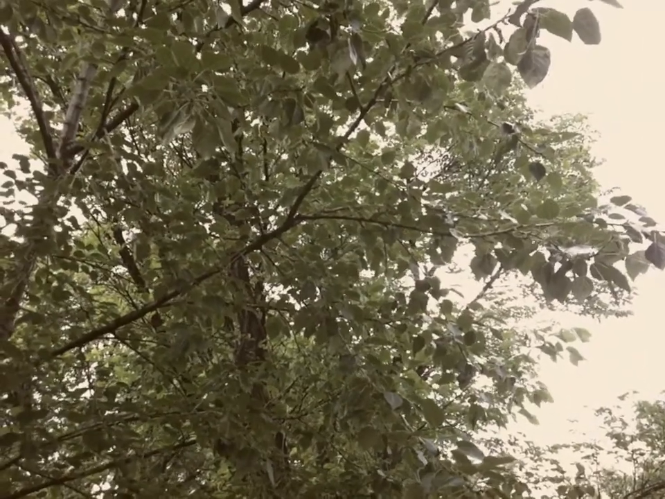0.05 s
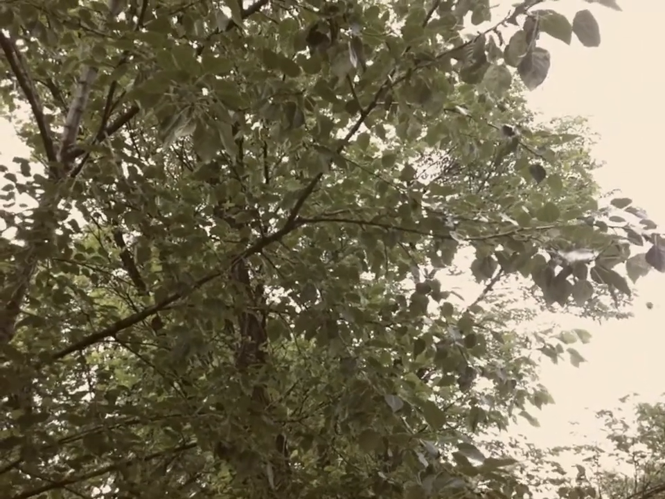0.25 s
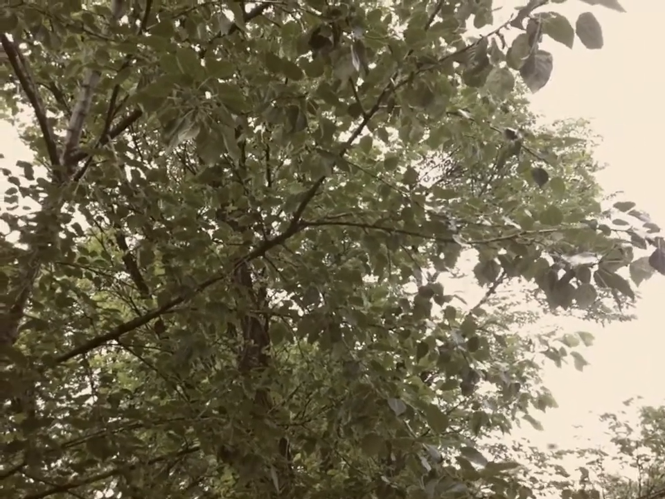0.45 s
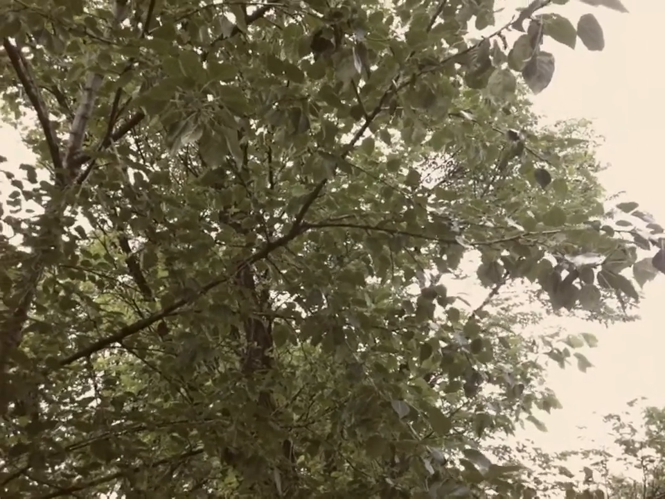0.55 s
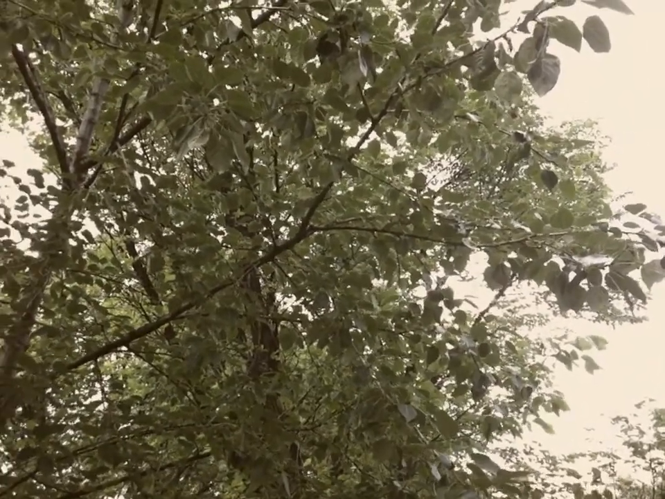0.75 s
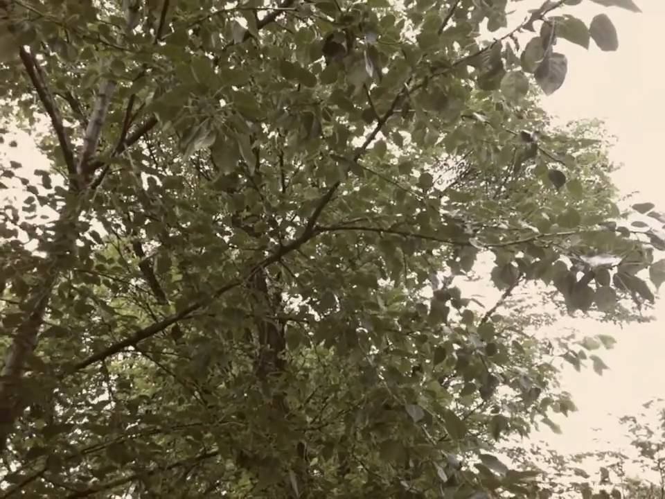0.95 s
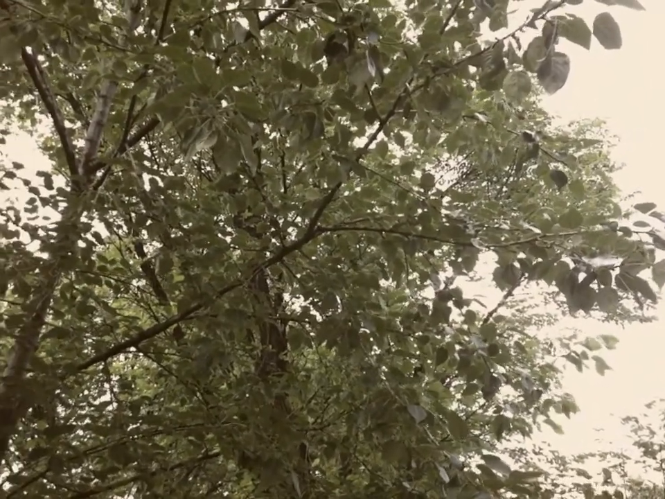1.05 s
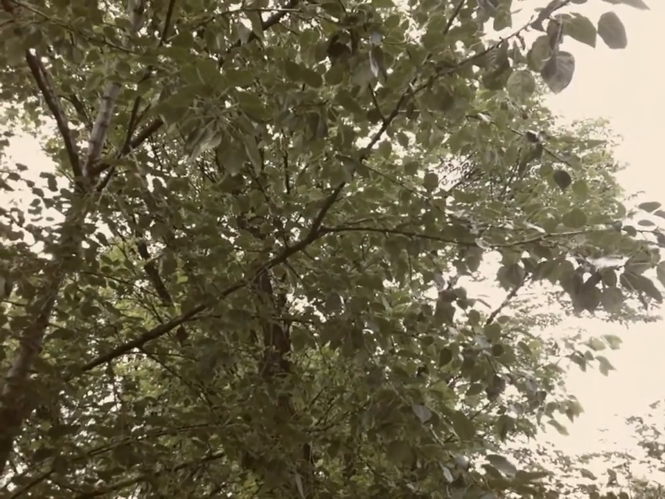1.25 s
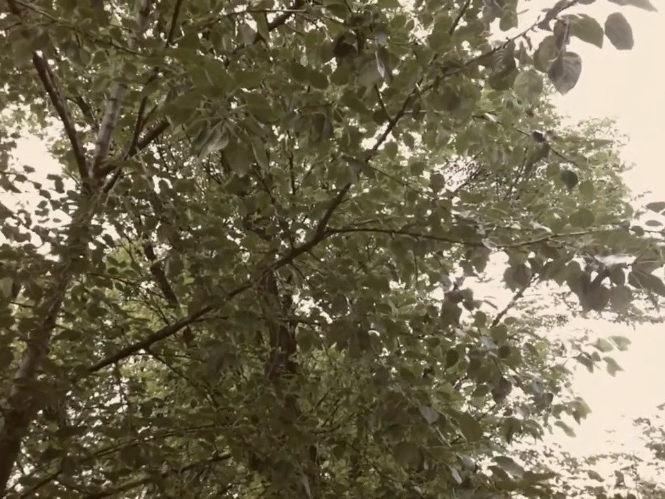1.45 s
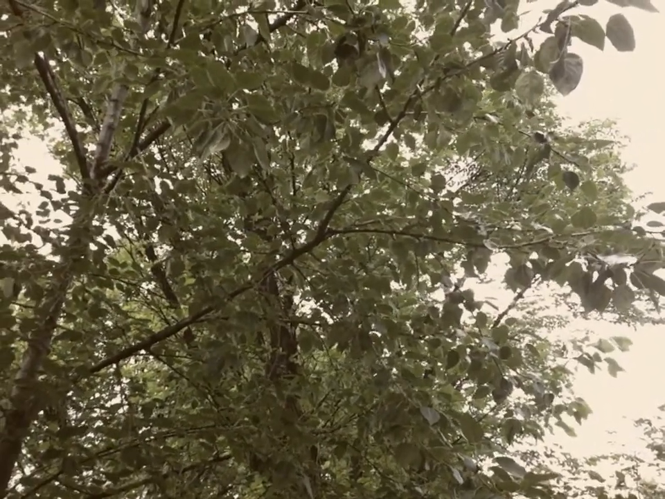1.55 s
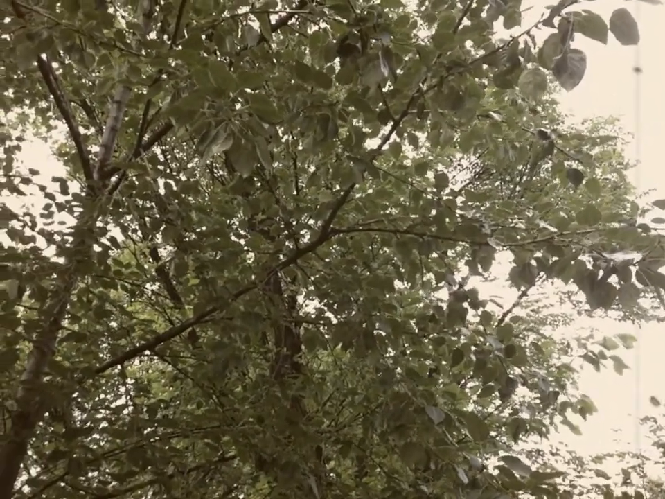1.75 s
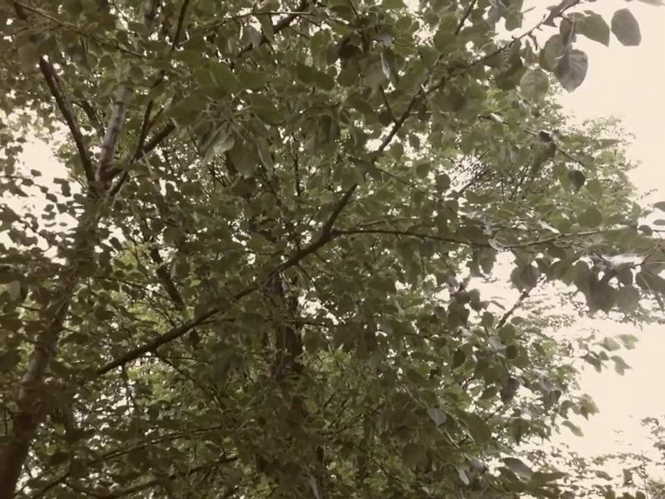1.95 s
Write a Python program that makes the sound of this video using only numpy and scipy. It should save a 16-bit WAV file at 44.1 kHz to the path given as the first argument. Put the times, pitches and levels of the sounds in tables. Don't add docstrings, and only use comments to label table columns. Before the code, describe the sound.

A magpie chatters harshly from a leafy tree, about four rasping notes a second, over faint traffic

```python
import sys
import numpy as np
from scipy import signal
from scipy.io import wavfile

SR = 44100
rng = np.random.default_rng(int(sys.argv[2]) if len(sys.argv) > 2 else 0)


def makeup_ratio(level_db):
    decades = np.asarray(level_db, float) / 20
    return 10 ** decades


def unload_wav(signal):
    wavfile.write(
        sys.argv[1],
        SR,
        np.round(np.clip(np.atleast_2d(signal).T, -1, 1) * 32767).astype(np.int16),
    )


N = 88200
LEAD = 8820


def rms_one(x):
    return x / np.sqrt(np.mean(x ** 2) + 1e-20)


def drift(rate_hz, size):
    r = np.exp(-2 * np.pi * rate_hz / SR)
    noise = rng.standard_normal(size + 20000)
    return rms_one(signal.lfilter([1], [1, -2 * r, r * r], noise)[20000:])


def resonances(x, table):
    out = 0
    for k, (hz, width_hz, db) in enumerate(table):
        r = np.exp(-np.pi * width_hz / SR)
        zeros = [(1 - r * r) / 2, 0, (r * r - 1) / 2]
        poles = [1, -2 * r * np.cos(2 * np.pi * hz / SR), r * r]
        out = out + (-1) ** k * makeup_ratio(db) * signal.lfilter(zeros, poles, x)
    return out


def bell(place, span_before, span_after):
    return np.exp(-(place / np.where(place < 0, span_before, span_after)) ** 2)


def rasping_overtones(turn, place, rasp):
    rough = .9 + (.6 - .9) * bell(place, .15, .5)
    stack = 0
    for k, hoarse in enumerate(rasp, start=2):
        stack = stack + np.real((np.sqrt(1 - rough) + np.sqrt(rough) * hoarse) * np.exp(1j * k * turn))
    return stack


def ringing_tones(since, top_hz, wobble):
    # (multiple of top pitch, climb [Hz/s], level [dB], centre from top [s], half length [s])
    focus_tones = [(3.0, 12000, 0.5, -0.0032, .016), (5.0, 3500, 0, -0.0086, 0.015),
                   (1.9, 7000, -14.5, -0.029, .02), (5.95, 11000, -9, 0.014, 0.0085),
                   (2.4, 2600, -8.5, -0.04, 0.021)]
    out = 0
    for multiple, climb, tone_db, centre, half in focus_tones:
        pitch_hz = (multiple * top_hz + climb * np.clip(since, -.06, .03)) * (1 + .009 * wobble)
        swell = np.exp(-((since - centre) / half) ** 2)
        out = out + makeup_ratio(tone_db) * swell * np.sin(2 * np.pi * np.cumsum(pitch_hz) / SR)
    return out


def magpie():
    # (top [s], level [dB], swell [s], fall [s], top pitch [Hz])
    chatter = [
        (-.015, -35.5, 0.14, 0.045, 936.5),
        (0.354, -32.5, .175, 0.093, 762.7),
        (.585, -31, .16, 0.041, 920.3),
        (.830, -31.5, .14, 0.026, 926.8),
        (1.063, -31.5, .15, 0.0326, 909.7),
        (1.283, -31, 0.13, 0.043, 920.4),
        (1.500, -29.5, 0.12, 0.035, 951.3),
    ]
    pitch_climb = [(-1.0, 0.01), (-.32, 0.09994), (-.14, .6), (0.0, 1.0), (0.417, 1.25), (1.07, 1.3)]
    beak_opening_db = [-10, -3.5, -2.8, -1.8, 0, -1.3, -2.24]
    clarity_db = [-11, -6.5, -3.5, -2.5, -0.5, -0.1, -0.86]
    # (centre [Hz], width [Hz], level [dB])
    chest_modes = [(1490, 620, -9), (2173, 420, -4.5)]
    throat_modes = [(2828, 500, -0.5), (3230, 624, -2.5)]
    beak_modes = [(4076, 340, -8.5), (4900, 764, -7), (5457, 680, -6.5), (6250, 710, -12)]
    air_modes = [(7870, 1600, -23.5), (10520, 4000, -34), (13300, 3300, -41.5)]
    start_hz = 727.7
    breath_share, low_breath_share = .6, .35

    size = N + LEAD
    t = (np.arange(size) - LEAD) / SR
    chest, throat, beak, air, tones = np.zeros((5, size)) + 1e-18
    wobble, flutter = drift(200, size), drift(180, size)
    white = rng.standard_normal(size)
    rasp = []
    for k in range(1, 8):
        rasp_hz = 120 * np.sqrt(k)
        rasp.append((drift(rasp_hz, size) + 1j * drift(rasp_hz, size)) / np.sqrt(2))

    for (top, db, swell, fall, top_hz), beak_db, clear_db in zip(chatter, beak_opening_db, clarity_db):
        on = (t > top - 1.2 * swell) & (t < top + 4 * fall)
        since = t[on] - top
        place = np.where(since < 0, since / swell, since / fall)

        climb = np.interp(place, *np.transpose(pitch_climb))
        pitch_hz = (start_hz + (top_hz - start_hz) * climb) * (1 + .012 * wobble[on])
        turn = 2 * np.pi * np.cumsum(pitch_hz) / SR
        stack = rasping_overtones(turn, place, [r[on] for r in rasp])
        breath = white[on] * (1 + .5 * np.cos(turn)) * np.sqrt(10)

        away = np.abs(place)
        loss_db = np.where(place < 0, 18 * away ** 2.51, 15 * away ** 1.28)
        effort = np.clip((place + 1) * 20, 0, 1) * makeup_ratio(db - loss_db + 1.2 * flutter[on])
        source = (np.sqrt(1 - breath_share) * stack + np.sqrt(breath_share) * breath) * effort
        low = (np.sqrt(1 - low_breath_share) * stack + np.sqrt(low_breath_share) * breath) * effort

        chest[on] += low * makeup_ratio(-15 * np.clip(place + 0.2, 0, 2))
        throat[on] += low * makeup_ratio(-0.5 * np.exp(-((place + 0.28) / 0.085) ** 2))
        beak[on] += source * makeup_ratio(beak_db + 6 * bell(place, 0.48, 2))
        air[on] += breath * effort * makeup_ratio(beak_db + 11 * bell(place, 0.54, 2))
        tones[on] += makeup_ratio(db + clear_db + 1.37 * flutter[on]) * ringing_tones(since, top_hz, wobble[on])

    out = resonances(chest, chest_modes) + resonances(throat, throat_modes)
    out = out + resonances(beak, beak_modes) + resonances(air, air_modes) + tones
    return signal.sosfilt(signal.butter(6, 1750, "high", fs=SR, output="sos"), out)


def outdoors(x):
    # (delay [s], level [dB])
    leaf_echoes = [(.0021, -13), (.0057, -9), (.0113, -11), (.019, -13), (.031, -16)]
    # (centre [Hz], width [Hz], level [dB], 60 dB decay [s])
    yard_tail = [(1870, 1230, -24.5, .6), (2520, 550, -18, 0.72), (5250, 1140, -26.5, 0.8),
                 (7900, 5500, -15, 0.37)]
    near = x.copy()
    for delay, db in leaf_echoes:
        lag = int(delay * SR)
        near[lag:] += makeup_ratio(db) * x[:len(x) - lag]
    t = np.arange(SR) / SR
    tail = 0
    for hz, width_hz, db, t60 in yard_tail:
        band = resonances(rng.standard_normal(SR), [(hz, width_hz, db)])
        tail = tail + band * makeup_ratio(-60 * t / t60)
    tail = tail * np.clip((t - .015) / 0.023, 0, 1)
    far = makeup_ratio(-19.5) * signal.fftconvolve(x, tail)[:len(x)]
    return (near + far)[LEAD:]


def traffic():
    # (frequency [Hz], level [dB])
    rumble_colour = [(18, -39), (30, -17.5), (274, 0.5), (337, 2), (384, -5), (698, -7.5), (816, -7.5),
                     (1830, -16), (15000, -49)]
    hz, db = np.transpose(rumble_colour)
    edges = 30 * 2 ** np.arange(0, 9.3, .5)
    white = rng.standard_normal((2, N + LEAD))
    out = 0
    for k, (low, high) in enumerate(zip(edges, edges[1:])):
        band_pass = signal.butter(2, [low, high], "band", fs=SR, output="sos")
        band = signal.sosfilt(band_pass, white[k % 2])[LEAD:]
        band_db = np.interp(np.log(low * high) / 2, np.log(hz), db)
        out = out + band * makeup_ratio(band_db + 0.87 * drift(8.3, N))
    low_cut = signal.butter(2, 64, "high", fs=SR, output="sos")
    return makeup_ratio(-52.5) * rms_one(signal.sosfilt(low_cut, out))


def engine():
    # (level before the change [dB], level after [dB])
    firing_orders = [(-69, -65.5), (-62, -65.5), (-67, -77)]
    # (start pitch [Hz], sag [Hz/s], level [dB], end [s])
    gear_whines = [(554, 33, -66.5, 1.1), (729, 21.6, -61.5, .65), (501, 13.5, -66.5, 0.41)]
    shift_s, before_hz, after_hz = 0.598, 48.6, 56.3
    t = np.arange(N) / SR
    after = np.clip((t - shift_s) / 0.027 + .5, 0, 1)
    turn = 2 * np.pi * np.cumsum(before_hz + (after_hz - before_hz) * after) / SR
    out = 0
    for k, (before_db, after_db) in enumerate(firing_orders):
        dip_db = 12 * np.exp(-((t - shift_s + 0.034 - 0.067 * k) / 0.032) ** 2)
        level_db = 0.5 + before_db + (after_db - before_db) * after - dip_db
        out = out + makeup_ratio(level_db + k * 1.7 * drift(24, N)) * np.sin((k + 1) * turn)
    for hz, sag, db, end in gear_whines:
        level = makeup_ratio(db + 2 * drift(10, N)) * np.clip((end - t) * 5, 0, 1)
        out = out + level * np.sin(2 * np.pi * (hz - sag * t / 2) * t + drift(5, N))
    return out


def small_bird():
    # (start [s], length [s], from pitch [Hz], to pitch [Hz], level [dB])
    peeps = [
        (1.352, .045, 4100, 3200, -46),
        (.365, .05, 2500, 2100, -51),
    ]
    t = (np.arange(N + LEAD) - LEAD) / SR
    out = 0
    for start, length, from_hz, to_hz, db in peeps:
        u = np.clip((t - start) / length, 0, 1)
        pitch_hz = (from_hz + (to_hz - from_hz) * u ** .6) * (1 + .022 * drift(400, N + LEAD))
        turn = np.pi * np.cumsum(pitch_hz) / SR
        out = out + makeup_ratio(db) * np.sin(np.pi * u) * (np.sin(2 * turn) + .5 * np.sin(turn))
    return out


def scene():
    return (outdoors(magpie() + small_bird()) + traffic() + engine())[None]


def roll_off(x):
    return signal.sosfilt(signal.butter(12, 15190, fs=SR, output="sos"), x)


def record(dry):
    hiss = makeup_ratio(-70.5) * rng.standard_normal(dry.shape)
    return roll_off(dry + hiss)


dry = scene()
out = record(dry)
unload_wav(out)
```